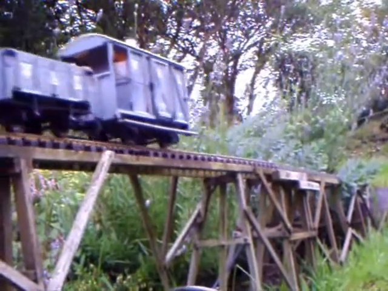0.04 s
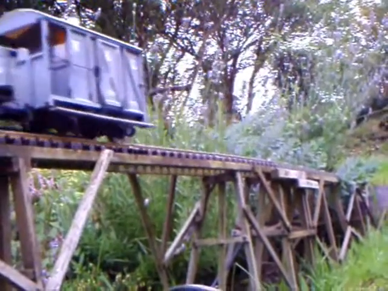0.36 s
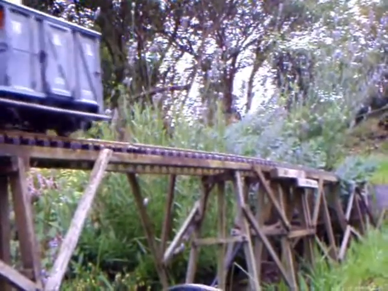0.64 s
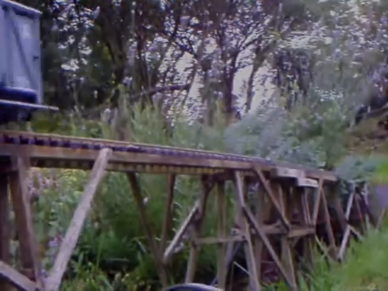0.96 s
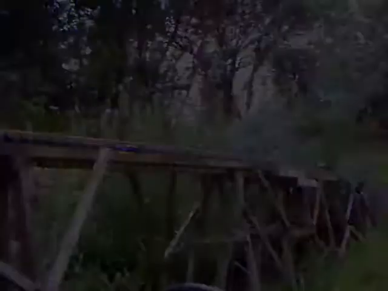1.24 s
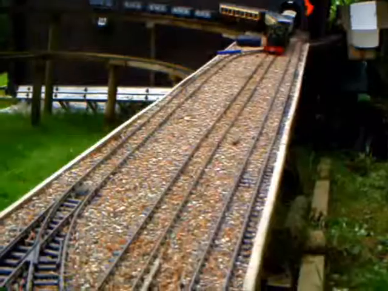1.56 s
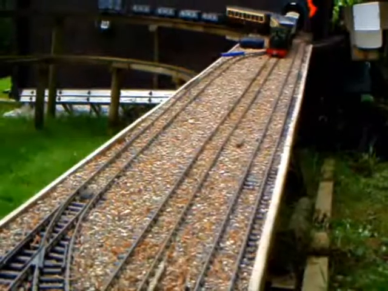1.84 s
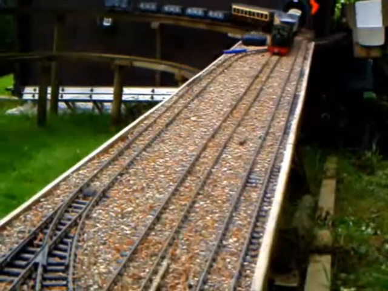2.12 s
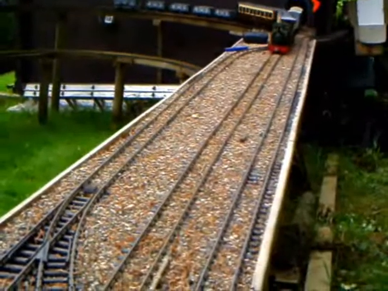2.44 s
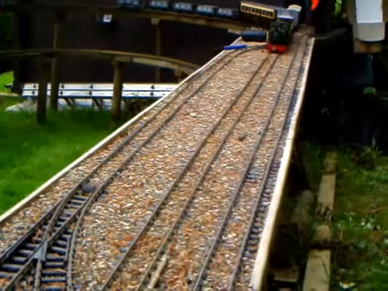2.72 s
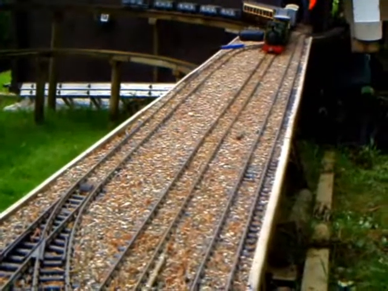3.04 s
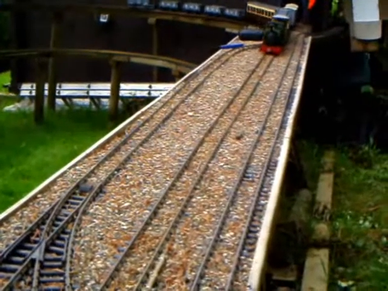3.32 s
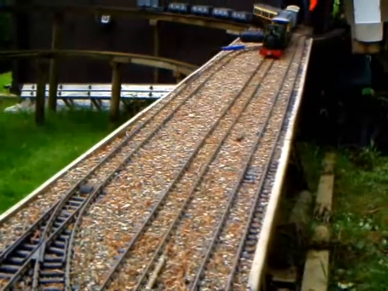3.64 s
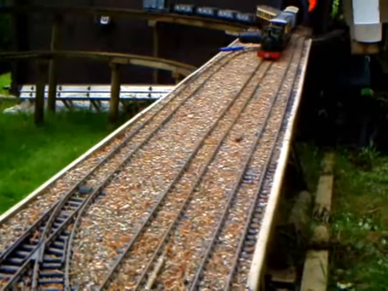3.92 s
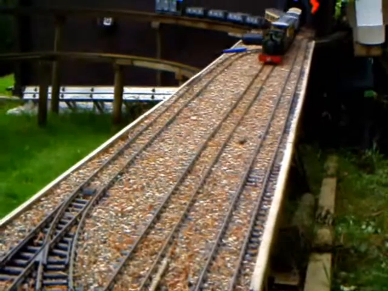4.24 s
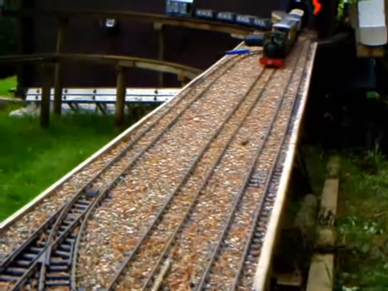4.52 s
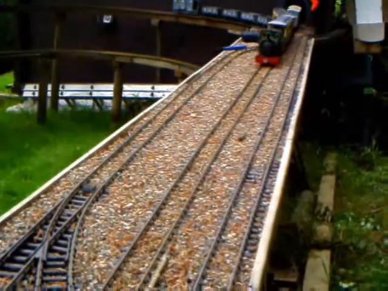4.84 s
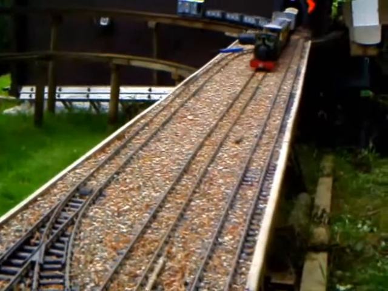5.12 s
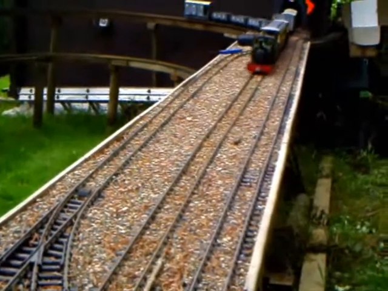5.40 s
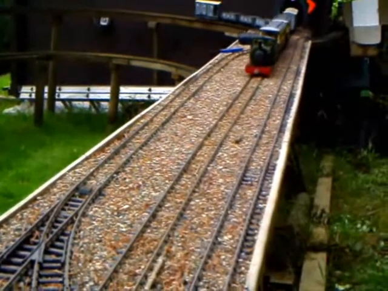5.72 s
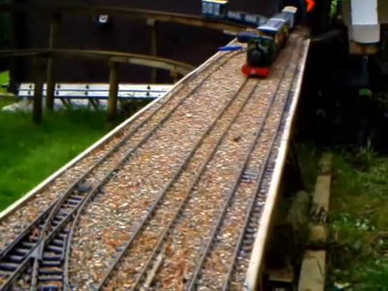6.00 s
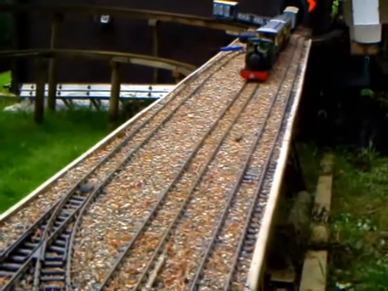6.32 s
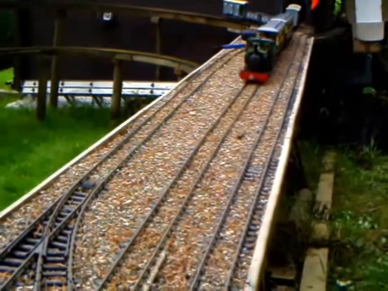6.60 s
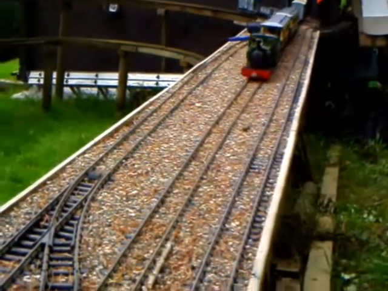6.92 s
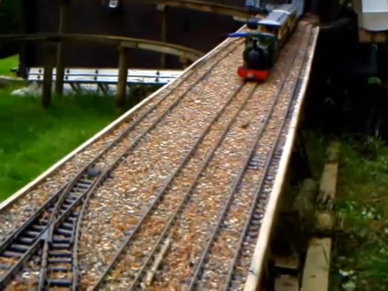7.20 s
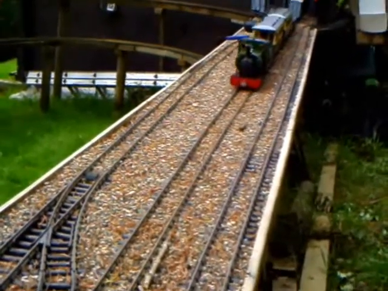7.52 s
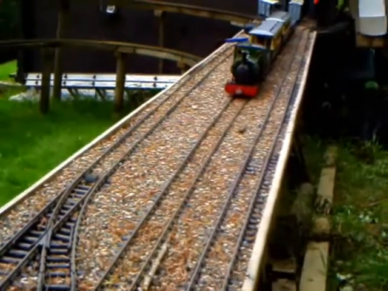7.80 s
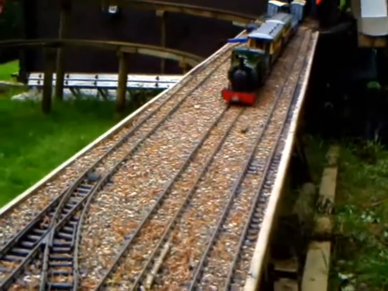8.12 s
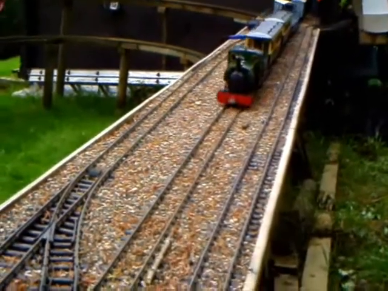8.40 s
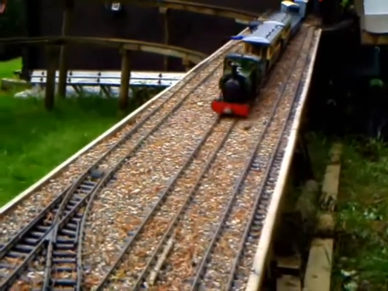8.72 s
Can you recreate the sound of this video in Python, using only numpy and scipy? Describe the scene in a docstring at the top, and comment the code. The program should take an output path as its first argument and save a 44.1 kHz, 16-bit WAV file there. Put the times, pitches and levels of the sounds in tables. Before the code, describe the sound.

On a garden railway, small wagon wheels click over rail joints and shake a wooden deck while couplings clunk. A loud knock on the camera case ends this abruptly. Then a miniature steam locomotive approaches with rapid, even puffs and a thin ringing hiss, gaining speed and volume above a low wheel rumble. One faint chirp passes early in the approach, and gusts finally thump the slightly gritty microphone.

```python
"""A garden railway. Model wagons rumble and clack over a wooden trestle; a sharp knock ends that scene.
Then a small steam engine gathers speed toward us, puffing four times to a wheel turn, while its burner
roars, steam leaks and its wheels roll louder. A bird chirps once, and near the end wind buffets
the microphone of a camera whose coarse sampling makes the treble gritty."""
import sys
import numpy as np
from scipy.fft import rfft, irfft, next_fast_len
from scipy.io import wavfile
from scipy.ndimage import map_coordinates

SR = 44100
rng = np.random.default_rng(int(sys.argv[2]) if len(sys.argv) > 2 else 0)


def store_pcm(level_fs):
    """Save levels as 16-bit WAV."""
    pcm = np.round(np.clip(level_fs, -1, 1) * 32767).astype(np.int16)
    wavfile.write(sys.argv[1], SR, np.atleast_2d(pcm).T)


N = 394694


def amp(db):
    """Decibels to gain."""
    return 10 ** (np.asarray(db) / 20)

def unit(x):
    """Scale to an average (rms) level of 1."""
    return x / np.sqrt(np.mean(x ** 2) + 1e-20)

def clock():
    """Time of every sample."""
    return np.arange(N) / SR

def curves(rows):
    """One value per sample for each column after the time."""
    s, *cols = np.transpose(rows)
    return [np.interp(clock(), s, c) for c in cols]

def wobble(rate):
    """A smooth curve through rate random points a second."""
    return map_coordinates(rng.standard_normal(int(N * rate / SR) + 4), [np.arange(N) * rate / SR])

def filtered(x, response):
    """Turn each frequency of x up or down."""
    size = next_fast_len(N + SR // 2)
    return irfft(rfft(x, size) * response(np.fft.rfftfreq(size, 1 / SR)), size)[:N]

def rush(spectrum, grain_db):
    """Grainy noise with the given tone colour."""
    hz, db = np.transpose(spectrum)
    grains = rng.standard_normal(N) * amp(grain_db * wobble(700))
    response = lambda f: amp(np.interp(np.log(f + 1), np.log(hz), db, left=-120, right=-120))
    return unit(filtered(grains, response))

def resonant(modes):
    """Noise that rings at a few pitches."""
    response = lambda f: sum(amp(db) * (1j * f * width / (hz * hz - f * f + 1j * f * width)) ** 2
                             for hz, width, db in modes)
    return unit(filtered(rng.standard_normal(N), response))

def singing(hz, width_hz):
    """Narrow noise around a moving pitch."""
    real, imag = [filtered(rng.standard_normal(N), lambda f: 1 / (1 + (f / width_hz) ** 3))
                  for _ in range(2)]
    return unit(np.real((real + 1j * imag) * np.exp(2j * np.pi * np.cumsum(hz) / SR)))

def burst(t, rise, t60):
    """A level that jumps up, then falls 60 dB in the time t60."""
    t = np.maximum(t, 0)
    return (1 - np.exp(-t / rise)) * amp(-60 * t / t60)


# Tone of the air and of the buffeting. Each row: frequency in Hz, relative level in dB.
AIR_TONE = [(90, -10.5), (170, 1.5), (300, -8), (600, -11), (1000, -6), (1600, -14.5), (3000, -17),
            (5500, -15)]
BUFFET_TONE = [(8.8, -31), (15, 2), (32, 1), (76, 0), (95, -2), (119, -11), (212, -13.5), (350, -25),
               (460, -50), (770, -120)]
# Gusts. Each row: start in seconds, length in seconds, level in dB.
GUSTS = [(5.6, 0.34, -54), (6.35, 0.15, -48.5), (6.673, 0.16, -42.5), (7.193, 0.53, -52.5),
         (8.01, 0.86, -30.5)]

def wind(breeze_db=-52, rise_s=0.03, fall_s=0.14):
    """Soft garden air, and low, lumpy gusts hitting the microphone."""
    gusts = sum(amp(db) * np.interp(clock(), [s, s + rise_s, s + length, s + length + fall_s],
                                    [0, 1, 1, 0]) for s, length, db in GUSTS)
    lumps = unit(amp(2.5 * wobble(25)) * rush(BUFFET_TONE, grain_db=2))
    return amp(-54.5) * rush(AIR_TONE, grain_db=1) + (amp(breeze_db) + gusts) * lumps


# The bird's call. Each row: time in seconds, pitch in Hz, level in dB.
CHIRP = [(3.4, 3070, -70), (3.42, 3035, -49), (3.48, 3020, -54), (3.51, 3040, -65), (3.57, 3020, -70)]

def bird():
    """One thin, breathy chirp."""
    hz, db = curves(CHIRP)
    sounding = (clock() > CHIRP[0][0]) & (clock() < CHIRP[-1][0])
    return sounding * amp(db) * singing(hz, width_hz=50)


# Knocks. Each row: start in seconds, strength in dB, brightness in dB, share of the full ring time.
KNOCKS = [(1.5072, -2.5, 1, 0.81), (2.355, -14.5, -14, 0.53)]
# Notes of the case. Each row: pitch in Hz, relative level in dB, full ring time in seconds.
CASE_NOTES = [(546, -2, 0.022), (890, -9, 0.017), (1380, -3.5, 0.026), (1900, -16, 0.014),
              (2300, -2, 0.017), (2950, -8, 0.018), (3480, -6, 0.019)]
# Tone of the crack. Each row: frequency in Hz, relative level in dB.
CRACK_TONE = [(120, -18), (280, -3.5), (600, 3), (1100, -2), (1700, -5.5), (2600, -5), (5500, -12)]

def knocks():
    """The camera's case cracks and rings briefly; a soft touch weakens the high notes."""
    ring, crack = np.zeros((2, N))
    t = np.arange(SR // 10) / SR
    for s, db, bright_db, share in KNOCKS:
        start = round(s * SR)
        for k, (hz, level, t60) in enumerate(CASE_NOTES):
            note = burst(t, 0.0005, t60 * share) * np.cos(2 * np.pi * hz * t + k * np.pi)
            ring[start:][:len(t)] += amp(db + level + bright_db * (hz > 700)) * note
        crack[start:][:len(t)] += amp(db + bright_db + 3) * burst(t, rise=0.00028, t60=0.014 * share)
    return ring + crack * rush(CRACK_TONE, grain_db=-2.5)


# Tone of the wooden deck, the rattle and the clacks. Each row: frequency in Hz, relative level in dB.
DECK_TONE = [(40, -36), (65, -46), (100, -0.5), (140, -12), (190, -5), (300, -9), (430, -11.5), (550, 0),
             (760, 2.5), (900, -0.5), (1150, -7.5), (1400, -14.5), (1650, -23), (2000, -16.5)]
RATTLE_TONE = [(880, -19), (1500, -11), (1710, -23), (1970, -26), (2340, -3), (2540, -7.5), (3450, -13.5),
               (3820, -12.5), (4210, -20.5), (4720, -18), (5500, -22.5), (7150, -52), (12100, -120)]
CLACK_TONE = [(710, -42), (1200, -16), (1640, -17), (1840, -8), (3100, 0.5), (3830, -5.5), (4260, -8.5),
              (5100, -7.5), (5500, -10), (7150, -49), (12100, -120)]
# Wheels hit rail joints, buffers meet. Each row: start in seconds, clatter in dB, deck thud in dB.
CLACKS = [(0.028, -23, -21), (0.182, -16.5, -24), (0.2215, -17, -42), (0.247, -18.5, -21),
          (0.286, -22.5, -25), (0.5, -22.5, -17), (0.518, -31, -32), (0.714, -26, -28),
          (0.7783, -21, -25.5), (0.807, -23, -23), (0.822, -14, -18.5), (0.8492, -17, -21),
          (0.902, -26, -41), (0.97, -29.5, -31), (1.117, -18, -28), (1.1304, -17, -23), (1.143, -29, -28),
          (1.201, -20, -30), (1.209, -44, -37), (1.3177, -24.5, -23), (1.4552, -13.5, -20.5),
          (1.481, -27, -25)]
# Couplings pull tight. Each row: start in seconds, strength in dB.
CLUNKS = [(0.541, -23.5), (1.291, -18)]
# A coupling's dull note. The row: pitch in Hz, width in Hz, relative level in dB.
COUPLING_NOTE = [(1120, 250, 0)]

def wagons(surge_every_s=0.332, deck_fade_db_per_s=2.2, rattle_fade_db_per_s=4):
    """Wheels shake the deck and fade as they roll away; rail joints clack and couplings clunk."""
    # The deck swells as each axle crosses a span.
    surge_db = 1.44 * np.cos(2 * np.pi * (clock() - 0.22) / surge_every_s)
    deck_db = -31 - deck_fade_db_per_s * clock() + surge_db
    rattle_db = -35.5 - rattle_fade_db_per_s * clock() + surge_db
    clatter, thud, clunk = np.zeros((3, N))
    t = np.arange(SR // 5) / SR
    tick = amp(-5.5) * burst(t - 0.001, rise=0.00061, t60=0.011)
    jolt = tick + amp(-2) * burst(t, rise=0.0022, t60=0.063)
    for s, clatter_db, thud_db in CLACKS:
        clatter[round(s * SR):][:len(t)] += amp(clatter_db) * jolt
        thud[round(s * SR):][:len(t)] += amp(thud_db) * burst(t, rise=0.0019, t60=0.069)
    for s, db in CLUNKS:
        clunk[round(s * SR):][:len(t)] += amp(db) * burst(t, rise=0.0012, t60=0.055)
    rumble = amp(deck_db + wobble(60.2)) * rush(DECK_TONE, grain_db=1.5)
    rattle = amp(rattle_db) * rush(RATTLE_TONE, grain_db=2.5)
    clacks = clatter * rush(CLACK_TONE, grain_db=1.5) + thud * rush(DECK_TONE, grain_db=3)
    return rumble + rattle + clacks + clunk * resonant(COUPLING_NOTE)


# The engine's wheel speed. Each row: time in seconds, turns a second.
WHEEL_SPEED = [(1.646, 1.547), (2.612, 2.328), (3.285, 2.478), (3.352, 2.71), (4.673, 3.206),
               (5.202, 3.302), (5.435, 3.681), (6.81, 3.49), (7.568, 4.052), (8.361, 4.151), (8.9, 3.641)]

def travel(first_beat_s=1.6456, start_m=5.84, metres_per_turn=0.14):
    """Wheel speed, turns since the first beat, and metres from us."""
    speed, = curves(WHEEL_SPEED)
    turns = np.cumsum(speed) / SR
    turns -= turns[round(first_beat_s * SR)]
    return speed, turns, np.maximum(start_m - metres_per_turn * turns, 1)


# Tone of the wheels. Each row: frequency in Hz, relative level in dB.
ROLL_TONE = [(80, -16), (140, -1), (290, 1), (480, -0.5), (900, -6.5), (1500, -21.5), (2100, -29.5),
             (3500, -18)]

def wheels(speed, distance):
    """Wheels rumble on the track, louder when faster and nearer."""
    return amp(-46.5 + wobble(20)) * speed / distance * rush(ROLL_TONE, grain_db=2)


# Notes of the fire tube. Each row: pitch in Hz, width in Hz, relative level in dB.
FLUE_NOTES = [(720, 150, 1), (1128, 127, -0.5)]

def burner(distance):
    """The flame roars in its tube, louder when nearer."""
    return amp(-40) / distance * resonant(FLUE_NOTES)


# Tone of the leak. Each row: frequency in Hz, relative level in dB.
LEAK_TONE = [(1400, -8.5), (2100, -11), (2550, 0.5), (2800, -2), (3400, -9), (3950, 5.5), (4200, 1.5),
             (4550, -11.5), (5500, -7)]
# How hard it leaks. Each row: time in seconds, strength in dB.
LEAK_STRENGTH = [(1.6, -59), (3.4, -51.5), (5.4, -45.5), (7.5, -44.5), (8.95, -49)]
# The chimney's ring. Each row: time in seconds, pitch in Hz.
RING_PITCH = [(1.6, 4050), (3.3, 4068), (4.1, 4050), (5, 4024), (5.85, 3896), (6.4, 4010), (7, 4030),
              (7.3, 4150), (8.95, 4150)]

def steam_leak():
    """Leaking steam hisses and keeps the chimney singing between beats."""
    leak_db, = curves(LEAK_STRENGTH)
    ring_hz, = curves(RING_PITCH)
    whistle_db = curves(EXHAUST_MIX)[1]
    hiss = amp(-4.5) * rush(LEAK_TONE, grain_db=-0.5)
    whistle = amp(whistle_db - 11) * singing(ring_hz, width_hz=61)
    return amp(leak_db + 3.1 * wobble(60)) * (hiss + whistle)


# For each of the four valves: where in a wheel turn it opens, and its accent in dB.
BEAT_TURNS = [0, .251, .4885, .718]
ACCENT_DB = [-1.24, 1, -0.19, 0.18]
# How hard the engine puffs. Each row: time in seconds, strength in dB.
EFFORT = [(1.6, -46.5), (3.1, -45), (3.4, -41.5), (4.1, -42.5), (4.3, -39), (4.8, -41), (5.85, -39),
          (6.65, -39.5), (7.05, -37.5), (7.33, -37.8), (7.53, -34), (7.95, -36), (8.25, -34.5),
          (8.9, -35.5)]

def beats(turns, scatter_db=1.1):
    """Four slightly uneven beats a turn. Each row: start and gap in seconds, strength in dB."""
    due = np.add.outer(np.arange(np.ceil(turns[-1])), BEAT_TURNS).ravel()
    s = np.interp(due[due < turns[-1]], turns, clock())
    db = np.interp(s, *np.transpose(EFFORT)) + np.resize(ACCENT_DB, len(s))
    db += scatter_db * rng.standard_normal(len(s))
    return np.transpose([s, np.gradient(s), db])

def steam_flow(chuffs, rise, t60):
    """Each valve opening empties a cylinder; rise and t60 are shares of the gap between beats."""
    flow, t = np.zeros(N + SR), np.arange(SR // 3) / SR
    for s, gap, db in chuffs:
        valve_open = 1 / (1 + (t / gap / 0.65) ** 8)
        flow[round(s * SR):][:len(t)] += amp(db + 5.5) * burst(t / gap, rise, t60) * valve_open
    return flow[:N]


# The exhaust's changing voice. Each row: time in seconds, then relative levels in dB
# of the airy ring, the whistle, the hollow note and the low puff.
EXHAUST_MIX = [(1.6, -4, -12.5, -3, -11), (3, 0.5, -12.5, -2.5, -21), (4.2, -3.5, 0, -3.5, -8),
               (5.1, -4.5, 2.5, -2.5, -2), (5.9, -4, 1.5, -4.5, -6), (6.6, -2, -3.5, -7, -4.5),
               (7.1, -3, -1.5, -1.5, 2.5), (7.7, -13.5, -10, -1.5, -4.5), (8.9, -8.5, -26, -9, -6)]
# Tone of the steam jet. Each row: frequency in Hz, relative level in dB.
JET_TONE = [(900, -10), (1400, -11), (1700, -10.5), (2150, -8.5), (2400, -2.5), (2750, -1.5), (3000, 0.5),
            (3350, -5), (3900, 6), (4350, 3.5), (4700, -2), (5500, 1.5)]
# The chimney's hollow note and low puff. Each row: pitch in Hz, width in Hz, relative level in dB.
HOLLOW_NOTES = [(1147, 150, 0.5), (2595, 110, -4)]
PUFF_NOTES = [(320, 300, 0.5), (684, 136, 0)]

def exhaust(chuffs, split_hz=160):
    """Each blast hisses and puffs up the chimney; its bright ring outlasts the hiss."""
    airy_db, whistle_db, hollow_db, puff_db = curves(EXHAUST_MIX)
    ring_hz, = curves(RING_PITCH)
    hiss = rush(JET_TONE, grain_db=0)
    blast = hiss + amp(hollow_db) * resonant(HOLLOW_NOTES) + amp(puff_db) * resonant(PUFF_NOTES)
    # The airy ring is two notes, one on each side of the whistle.
    airy = unit(singing(ring_hz - split_hz, width_hz=163) + singing(ring_hz + split_hz, width_hz=163))
    ring = amp(airy_db) * airy + amp(whistle_db) * singing(ring_hz, width_hz=135)
    blast *= steam_flow(chuffs, rise=0.16, t60=1.53)
    ring *= steam_flow(chuffs, rise=0.069, t60=2.14)
    return blast + ring


def scene(switch_s=1.532, fade_s=0.014):
    """The wagons give way abruptly to the engine, whose wheel speed sets both beat and rumble."""
    speed, turns, distance = travel()
    engine = wheels(speed, distance) + burner(distance) + steam_leak() + exhaust(beats(turns))
    engine_share = np.clip((clock() - switch_s) / fade_s + 0.5, 0, 1)
    trains = (1 - engine_share) * wagons() + engine_share * engine
    return (wind() + bird() + knocks() + trains)[None]

def record(dry, hold=4, top_hz=16000):
    """The camera flattens loud peaks and repeats each sample, mirroring the sound into gritty treble."""
    muffled = filtered(dry[0], lambda f: 1 / np.sqrt(1 + (2 * hold * f / SR) ** 20))
    held = np.repeat(np.clip(muffled[::hold], -1, 1), hold)[:N]
    return filtered(held, lambda f: np.clip((top_hz - f) / 300, 0, 1))[None]


dry = scene()
out = record(dry)
store_pcm(out)
```